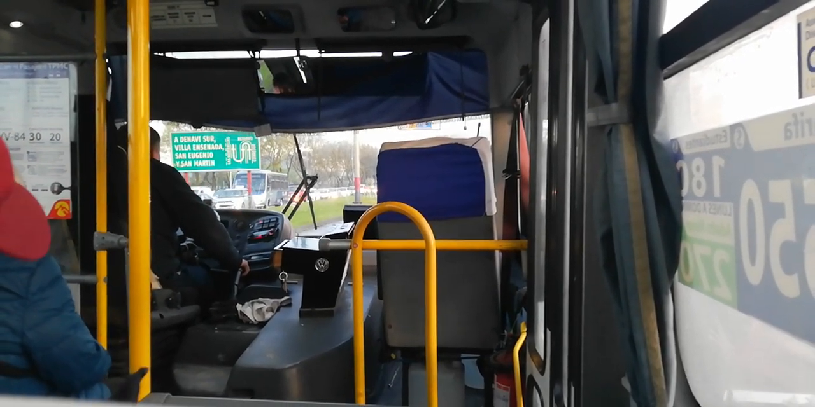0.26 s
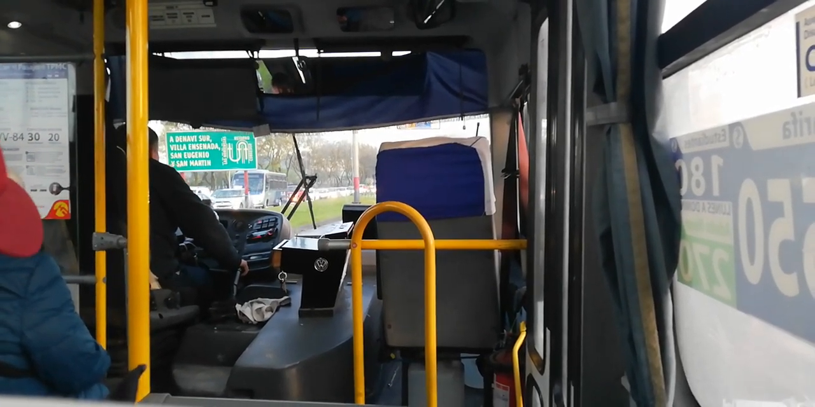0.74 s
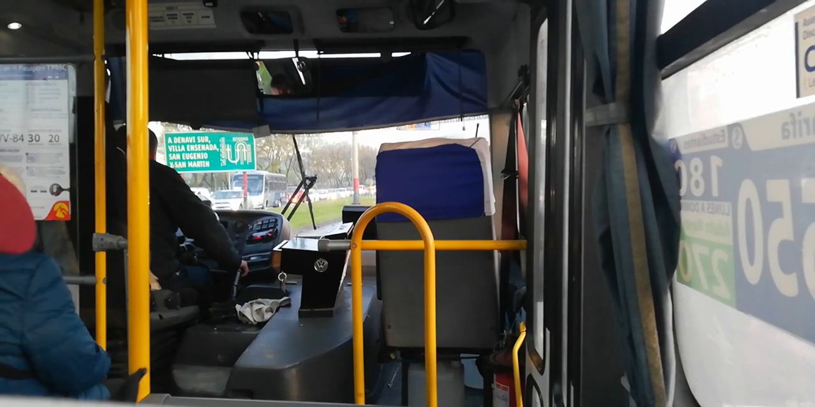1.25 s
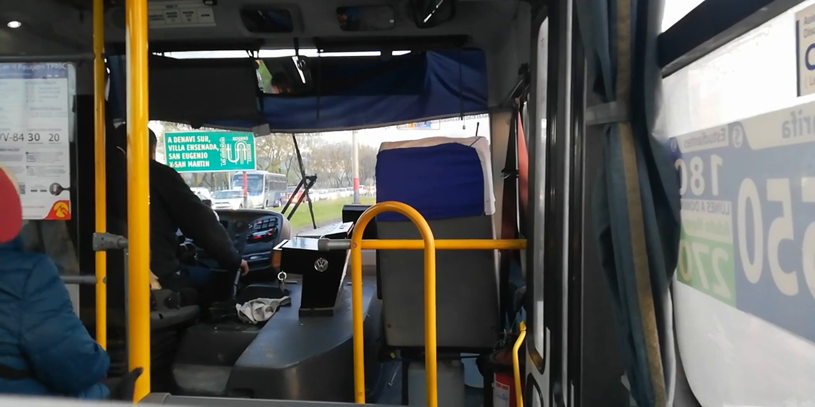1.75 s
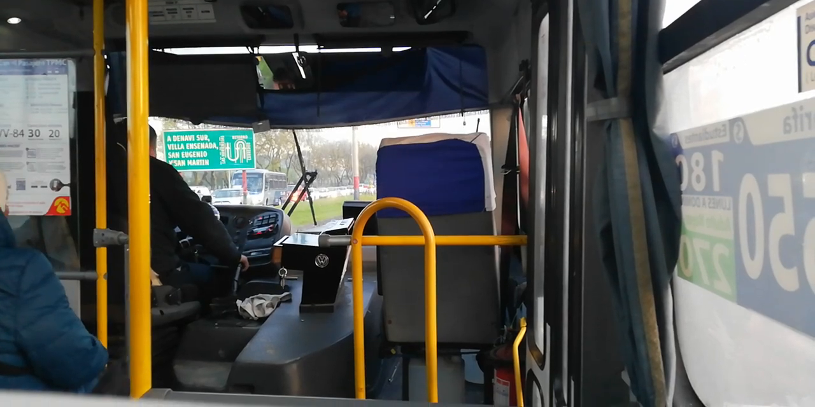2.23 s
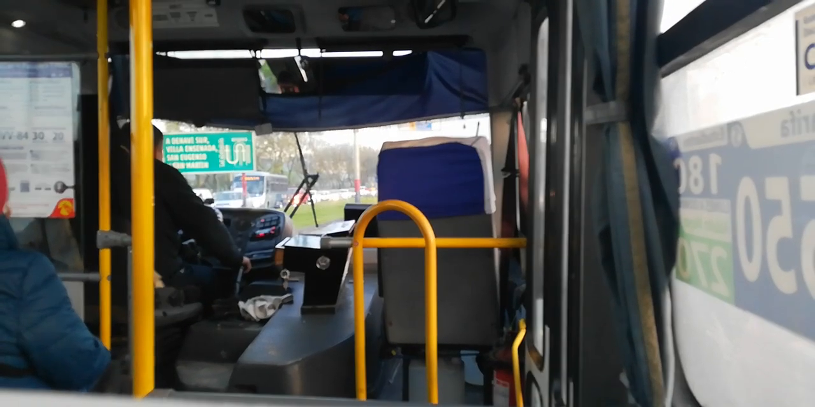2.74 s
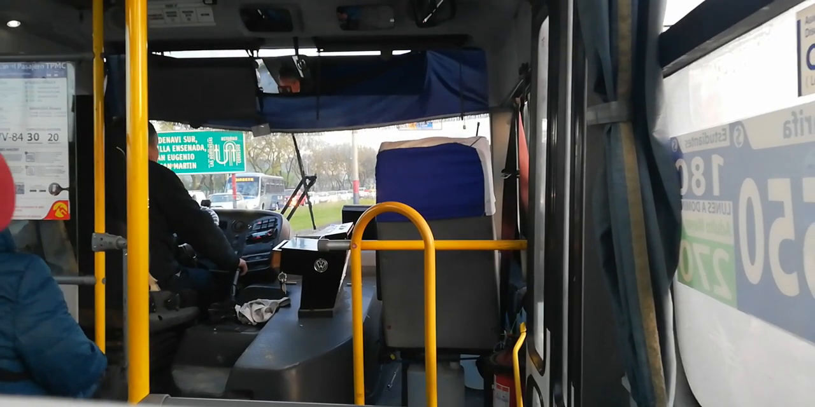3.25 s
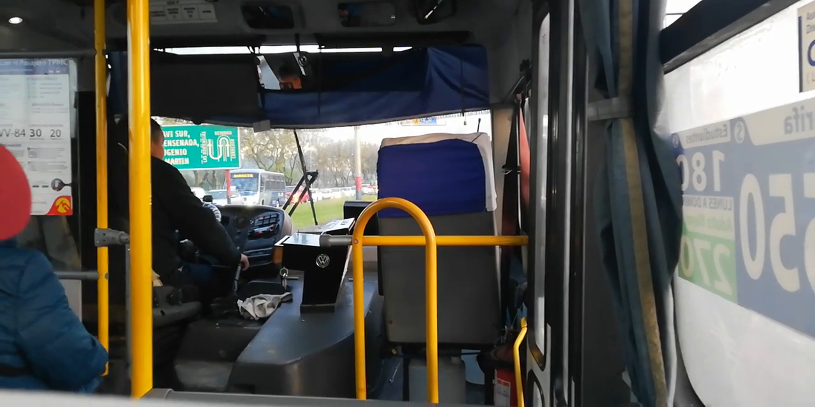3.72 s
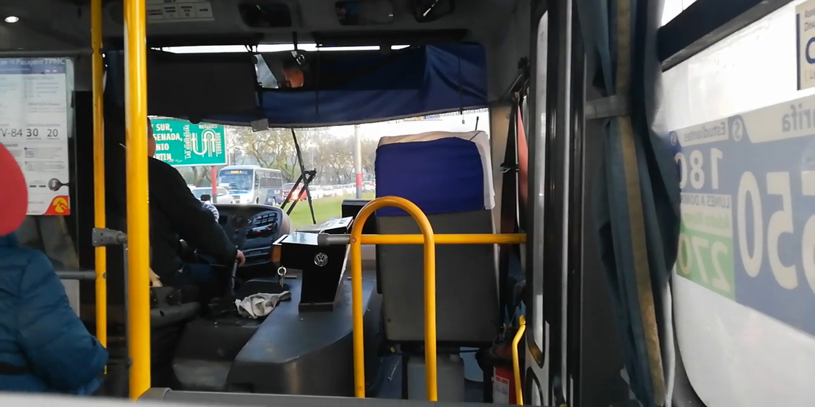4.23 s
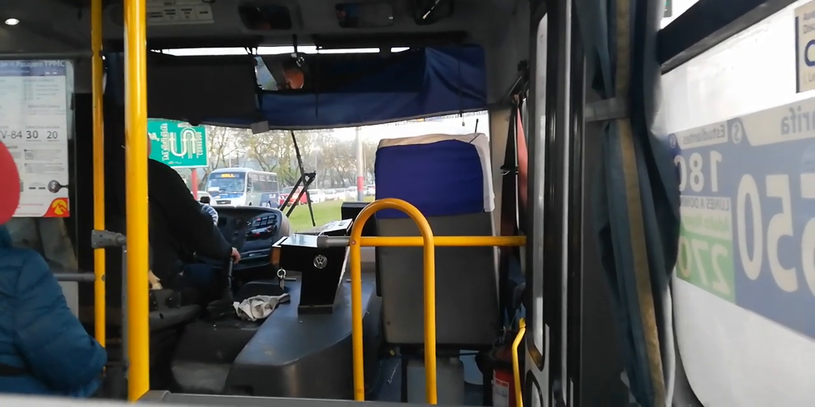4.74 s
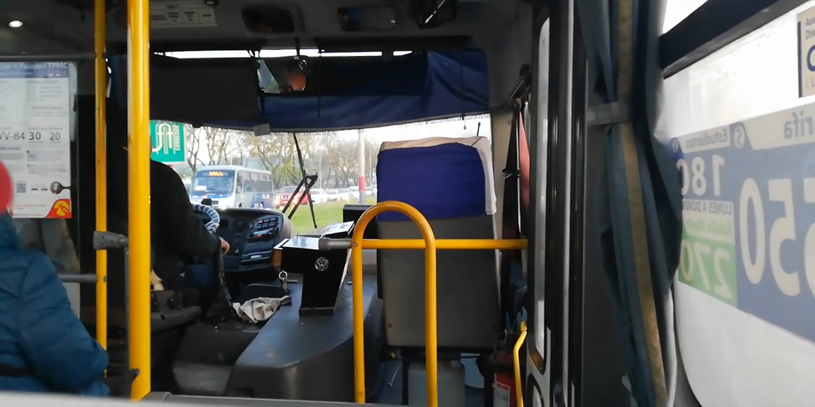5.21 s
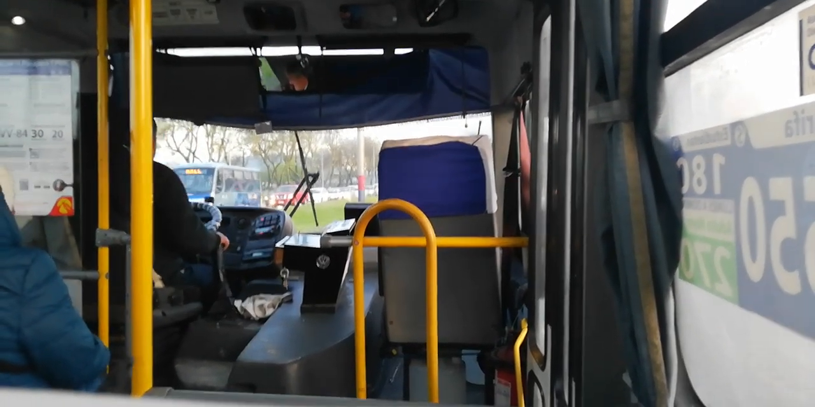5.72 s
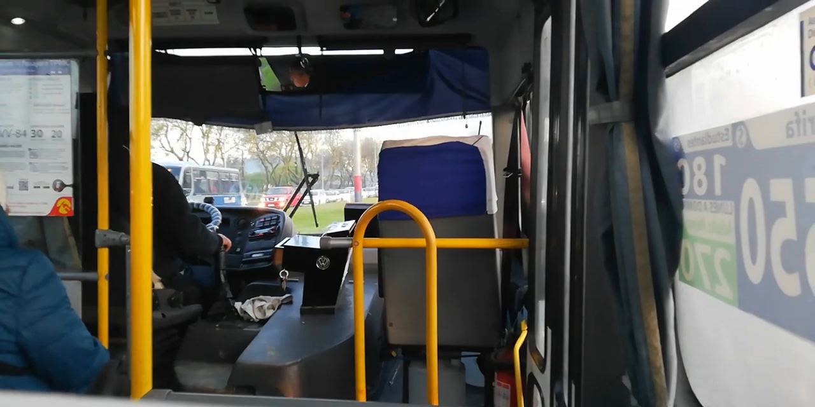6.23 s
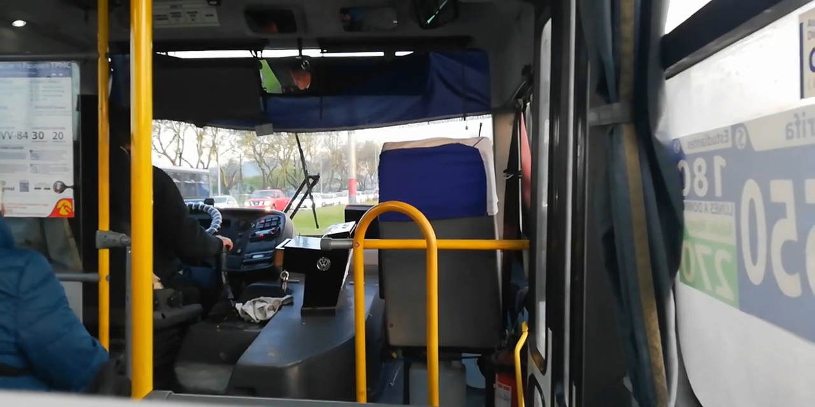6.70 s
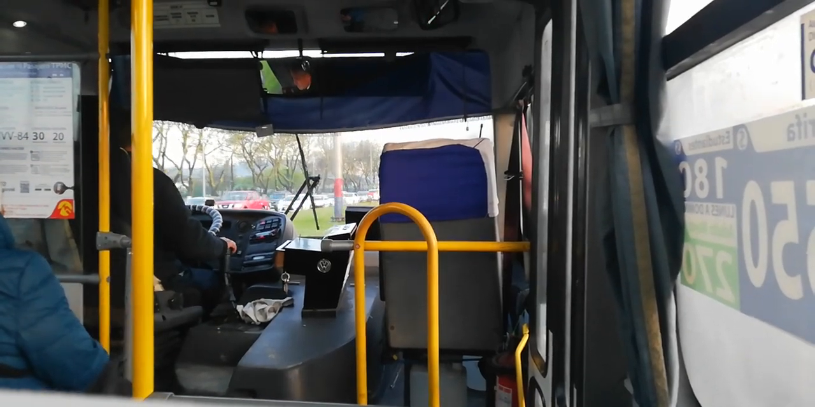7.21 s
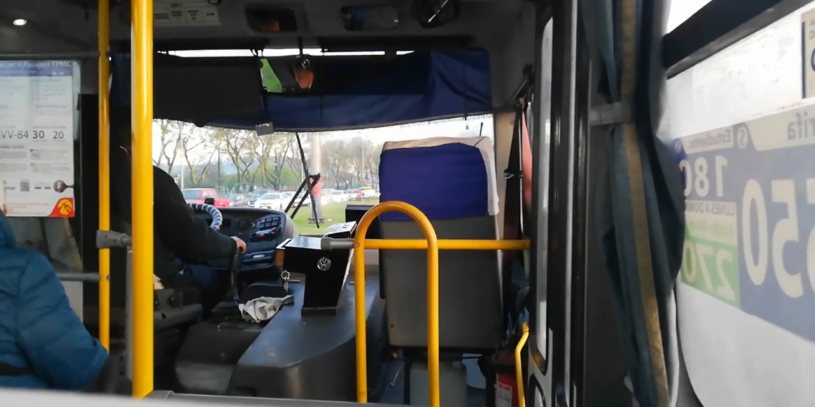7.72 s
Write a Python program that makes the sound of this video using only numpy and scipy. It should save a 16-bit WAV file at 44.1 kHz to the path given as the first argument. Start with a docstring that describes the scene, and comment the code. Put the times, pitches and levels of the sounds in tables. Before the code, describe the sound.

Inside a city bus a diesel engine idles with a low, uneven rumble for two seconds, then pulls away, booming and climbing in pitch. The revs fall at a gear change, where fittings tick and a loose panel knocks to the right, then rise again with a thin turbo whistle. Close, boomy stereo cabin sound, with soft hiss above.

```python
"""A four-cylinder diesel heard inside a city bus: it idles, pulls away, drops its revs at a gear change, pulls again.
Sines at multiples of the firing rate and shaped noise boom in the cabin; each firing knocks the head, rings the
block and bursts noise. The turbo whistles as a flickering band, air hisses in puffs, a loose panel knocks off to
the right, fittings tick and a faint tone hangs behind. Two microphone ports a hand apart."""
import sys
import numpy as np
from scipy import signal
from scipy.fft import rfft, irfft, next_fast_len
from scipy.io import wavfile
from scipy.ndimage import uniform_filter1d, map_coordinates

SR = 44100
rng = np.random.default_rng(int(sys.argv[2]) if len(sys.argv) > 2 else 0)


def waveform_to_disk(signal):
    """Save audio, clipped to [-1, 1], as 16-bit WAV at the path in sys.argv[1]."""
    frames = np.transpose(np.atleast_2d(signal))
    scaled = np.clip(frames, -1, 1) * 32767
    samples = np.round(scaled).astype(np.int16)
    wavfile.write(sys.argv[1], SR, samples)


N = 351014

# engine treble before fixed lifts: t/s, clatter level/dB, head knock level/dB
TREBLE_COURSE = [(0, -48.5, -55.5), (1.95, -47, -57), (2.2, -44.5, -56.5), (2.6, -45.5, -56),
                 (3.3, -44.5, -67), (3.45, -42.5, -52), (3.94, -41, -53.5), (4.57, -41.5, -52.5),
                 (4.81, -44.5, -53.5), (5.05, -42, -46.5), (5.5, -43, -54.5), (6.36, -42.5, -55.5),
                 (7.47, -40.5, -50), (7.96, -42.5, -58)]
# how hard the engine works: t/s, torque level/dB, body rumble level/dB
LOAD_COURSE = [(0, -7.5, -9.5), (1.8, -13, -9.5), (2.13, 2, 1.5), (2.4, 3, 2), (2.7, -1.5, -1.5),
               (3.1, -4, 1), (3.45, -2, -1), (3.62, -3, 2), (3.9, 2.5, 1), (4.1, -6.5, 3), (4.35, 1.5, 3),
               (4.75, -0.5, 2), (4.96, -14, 0), (5.14, -4, 3), (5.58, -11, -2), (5.72, -10, 5.5),
               (6.13, 3.5, 1.5), (6.4, -8, 3.5), (6.9, -1.5, 3), (7.3, -6.5, 4), (7.78, 3, 4.5),
               (7.96, 0, -3.5)]
# cabin resonances, for the weak orders and the rumble: f/Hz, relative level/dB (per Hz for noise)
CABIN_RESPONSE = [(15, -3.5), (45, -14), (76, 0.5), (100, 2.5), (122, 4.5), (137, -9.5), (152, 3.5),
                  (175, -1.5), (205, -22.5), (260, -54)]
CLATTER_MID_DB = -44  # middle clatter, from which ring, hiss and intake grow


def amp(db):
    """Amplitude factor of a level in dB."""
    return 10 ** (np.asarray(db) / 20)


def unit(x):
    """x scaled to rms 1."""
    return x / np.sqrt(np.mean(x ** 2) + 1e-20)


def along(points, hz):
    """Interpolates (Hz, value) points on a log frequency axis."""
    f, value = np.transpose(points)
    return np.interp(np.log(hz + 1), np.log(f + 1), value)


def curves(rows):
    """One value per sample for each column after the time."""
    s, *columns = np.transpose(rows)
    return [np.interp(np.arange(N) / SR, s, column) for column in columns]


def wobble(rate):
    """A smooth random curve with rate knots a second."""
    knots = rng.standard_normal(int(N * rate / SR) + 4)
    return map_coordinates(knots, [np.arange(N) * rate / SR])


def filtered(x, response):
    """x times a complex response of frequency."""
    m = next_fast_len(N + SR // 2)
    return irfft(rfft(x, m) * response(np.fft.rfftfreq(m, 1 / SR)), m)[..., :N]


def noise(spectrum, alike, patchy_db):
    """Stereo noise of rms 1 with patches of random gain; alike is the correlation between the ports."""
    z = signal.stft(rng.standard_normal((2, N)), nperseg=512)[2]
    field = uniform_filter1d(rng.standard_normal(z.shape[1:]), 6, 0)  # smooth over frequency
    field = uniform_filter1d(field, 8, 1)  # smooth over time
    patchy = signal.istft(z * amp(patchy_db * unit(field)), nperseg=512)[1][:, :N]
    top_hz = spectrum[-1][0]
    shaped = filtered(patchy, lambda hz: amp(along(spectrum, hz)) * (hz < top_hz))
    turn = np.arccos(np.clip(alike, -1, 1)) / 2
    mid, side = shaped * [[np.cos(turn)], [np.sin(turn)]]
    return unit(np.array([mid + side, mid - side]))


def struck(hits, modes, scatter_db, attack):
    """Each (s, dB) blow rings decaying sine modes (Hz, dB, t60 s) at new strengths; attack in s."""
    out, t = np.zeros(N + SR), np.arange(SR // 8) / SR
    hz, level, t60 = np.transpose(modes)[:, :, None]
    onset = (1 - np.exp(-t / attack)) ** 2
    rings = amp(level - 60 * t / t60) * np.sin(2 * np.pi * hz * t) * onset
    spreads = rng.standard_normal((len(hits), len(modes)))
    for (s, db), spread in zip(hits, spreads):
        out[round(s * SR):][:len(t)] += amp(db + scatter_db * spread) @ rings
    return out[:N]


def bursts(hits, t60, spectrum):
    """Noise that starts at once at each (s, dB) hit and dies away."""
    blows = np.zeros(N)
    blows[[round(s * SR) for s, db in hits]] = [amp(db) for s, db in hits]
    fade = amp(-60 * np.arange(SR // 5) / SR / t60)
    return signal.fftconvolve(blows, fade)[:N] * noise(spectrum, alike=0.039, patchy_db=1)


def swells(rows):
    """Flat-topped swells from (s, half length s, dB) rows."""
    t = np.arange(N) / SR
    return sum(amp(db) * np.exp(-((t - s) / half) ** 4) for s, half, db in rows)


def steady(x):
    """x held near rms 1 over a running half second, whatever the engine speed."""
    return x / np.sqrt(np.abs(uniform_filter1d(x ** 2, SR // 2)) + 1e-9)


def late_left(pair, seconds):
    """The sound reaches the left port later than the right one."""
    return filtered(pair, lambda hz: np.exp(-1j * np.pi * hz * seconds * np.array([[1], [-1]])))


def engine_side(pair):
    """The engine's sound reaches the left port at a later phase."""
    # left port behind the right: f/Hz, phase lag/rad
    phase_lag = [(200, .2), (344, 1), (470, 2.1), (730, 3), (1100, 6.1), (1900, 5.6), (2050, 4.7),
                 (2300, 5.7), (3200, 5.2)]
    return filtered(pair, lambda hz: np.exp(-.5j * along(phase_lag, hz) * np.array([[1], [-1]])))


def fan():
    """A thin, slightly unsteady sine, perhaps a heater fan."""
    # faint tone: t/s, f/Hz, level/dB
    fan_tone = [(0, 451.3, -59.5), (2, 453, -61.5), (2.5, 447, -54), (2.9, 440.5, -54.5), (3.2, 443, -66)]
    hz, db = curves(fan_tone)
    return amp(db + 1.6 * wobble(4.7)) * np.sin(2 * np.pi * np.cumsum(hz) / SR)


def rough_swell():
    """Brief rough noise swells in the middle range, at idle and on pulling away."""
    # swells: t/s, half length/s, level/dB
    swell_times = [(1.315, 0.17, -52.5), (2.348, 0.16, -51.5)]
    # their noise: f/Hz, level/dB per Hz
    rough_spectrum = [(750, -29), (900, 6), (1040, -8), (1160, 7.5), (1330, -3), (1700, -14)]
    return amp(1.5 * wobble(39.2)) * swells(swell_times) * noise(rough_spectrum, alike=0.76, patchy_db=3)


def chuffs():
    """Short chuffs high up: noise that starts at once and dies away."""
    # chuffs: t/s, level/dB
    chuff_hits = [(3.093, -48), (3.424, -44), (5.84, -43), (5.89, -40), (6.044, -40.5), (6.097, -44),
                  (6.15, -43), (6.252, -41.5), (6.298, -47), (6.325, -45)]
    # their noise: f/Hz, level/dB per Hz
    chuff_spectrum = [(4000, -34), (5000, 2), (6100, -3.5), (7200, -7), (8700, 4), (9600, -4), (11500, -48)]
    return bursts(chuff_hits, 0.17, chuff_spectrum)


def fitting_ticks():
    """Fittings tick: short high modes ring together with a spit of noise."""
    # ticks: t/s, relative level/dB
    tick_hits = [(2.6694, -39), (4.944, -41), (4.9675, -35), (4.9857, -35), (5.026, -30), (5.8376, -30.5),
                 (5.874, -32), (5.888, -31), (5.94, -19), (5.9713, -31)]
    # modes of a fitting: f/Hz, relative level/dB, t60/s
    fitting_modes = [(6570, 3, 0.011), (7730, 5, 0.011), (9300, 1, 0.0098)]
    # noise of a tick: f/Hz, level/dB per Hz
    spit_spectrum = [(1500, -20), (2600, 0), (4200, -6), (7500, 0), (11500, -2), (13200, -20), (15500, -38)]
    ring = struck(tick_hits, fitting_modes, scatter_db=-2.0, attack=0.00034)
    return amp(-9) * ring + amp(-2.5) * bursts(tick_hits, 0.012, spit_spectrum)


def panel_knocks():
    """A loose panel off to the right: detuned modes swell in softly over a burst of noise that starts at once."""
    # knocks: t/s, relative level/dB
    knock_hits = [(4.245, -32), (4.595, -30), (4.947, -28), (5.007, -28.5), (5.175, -32), (5.639, -33),
                  (5.705, -33), (5.764, -28), (5.889, -18.5), (5.954, -21), (6.323, -30), (6.505, -28),
                  (6.787, -33), (7.224, -26.5), (7.566, -29)]
    # modes of the panel: f/Hz, relative level/dB, t60/s
    panel_modes = [(580, 0, .027), (680, -8, .024), (1050, -6, .025)]
    # noise under each knock: f/Hz, level/dB per Hz
    knock_spectrum = [(380, -5), (600, -8), (1050, -17), (1400, -22)]
    thud = np.zeros(N)
    for hit in knock_hits:
        detune = 1 + .022 * rng.standard_normal(len(panel_modes))  # never held the same way twice
        modes = [(hz * d, db, t60) for (hz, db, t60), d in zip(panel_modes, detune)]
        thud += struck([hit], modes, scatter_db=1.2, attack=.016)  # a padded contact swells in slowly
    placed = late_left(thud * amp([[30], [31]]), seconds=0.00062)
    return placed + amp(-20) * bursts(knock_hits, 0.37, knock_spectrum)


def air_puffs():
    """Short puffs of air: flat-topped swells of flickering noise."""
    # puffs: t/s, half length/s, level/dB
    puff_times = [(1.26, 0.11, -54), (1.736, 0.032, -51.5), (2.297, 0.054, -48.5), (2.673, 0.0093, -44.5),
                  (2.709, 0.032, -49.5), (2.873, 0.045, -45), (2.948, 0.018, -46), (3.824, 0.043, -49),
                  (5, 0.062, -49.5), (5.51, 0.023, -50), (5.864, 0.026, -47), (6.603, 0.018, -49)]
    # their noise: f/Hz, level/dB per Hz
    puff_spectrum = [(3000, 7), (5000, 11), (8000, 8), (11000, 8.5), (14000, -8), (15800, -18)]
    return swells(puff_times) * amp(1.8 * wobble(60)) * noise(puff_spectrum, alike=.05, patchy_db=1.5)


def air_hiss(gate):
    """Intake and street hiss grow with the clatter; the wide hiss also pulses with the firings."""
    # wide hiss: f/Hz, level/dB per Hz
    hiss_spectrum = [(2060, 3.5), (3500, 8), (4070, 5), (4910, 10.5), (6340, 6), (9340, 4.5), (12200, -4),
                     (14500, -13), (15600, -14)]
    # breathy band of the intake: f/Hz, level/dB per Hz
    intake_spectrum = [(7800, -16), (8500, -5), (9200, -7), (9900, -8)]
    above_mid = curves(TREBLE_COURSE)[0] - CLATTER_MID_DB
    # levels in dB at middle clatter, growth in dB per clatter dB
    hiss_db = -50 + 1.29 * above_mid + 0.34 * wobble(14)
    intake_db = -61.5 + 3.5 * above_mid
    hiss = unit(gate ** .5 * noise(hiss_spectrum, alike=0.0073, patchy_db=1.8))
    return amp(hiss_db) * hiss + amp(intake_db) * noise(intake_spectrum, alike=0.046, patchy_db=1.0)


def turbo():
    """The turbo's breathy whistle: a gliding sine, randomly modulated at each port."""
    # whistle: t/s, f/Hz, level/dB
    whistle = [(3.6, 8000, -80), (4.2, 8700, -64), (4.62, 9500, -53), (4.76, 8700, -60), (4.8, 8600, -90),
               (6.65, 8400, -92), (6.8, 8750, -52), (6.95, 9100, -49), (7.15, 9560, -52), (7.4, 10200, -55),
               (7.7, 10950, -61), (7.96, 11450, -70)]
    hz, db = curves(whistle)
    # widens the line to a flickering band
    blur = np.array([wobble(220), wobble(220)]) * amp(1.5 * wobble(20))
    return amp(db) * blur * np.sin(2 * np.pi * np.cumsum(hz) / SR)


def road_shudder():
    """Deep shudder through the wheels: slowly wavering low noise, nearly alike at both ports."""
    # shudder: f/Hz, level/dB per Hz
    road_spectrum = [(20, -8), (40, 5), (62, -14)]
    road_db = -33 + 2.6 * wobble(4.14)  # at body rumble 0
    return amp(road_db) * noise(road_spectrum, alike=.998, patchy_db=-0.5)


def floor_roar(firings, load_db):
    """The floor roars with the cabin rumble, throbbing once a firing."""
    # roar: f/Hz, level/dB per Hz
    floor_spectrum = [(170, -6), (210, 5.5), (228, -6.5), (247, 2), (275, -5), (330, -8), (450, -18),
                      (600, -13), (850, -27)]
    throb = 1 + .3 * np.cos(2 * np.pi * firings)
    roar = engine_side(throb * noise(floor_spectrum, alike=.9, patchy_db=1.5))
    return amp(-37.5 + 0.96 * load_db) * roar  # dB at load 0, then per load dB


def firing_blows(firings):
    """Time (s) and strength (dB) of each firing, and a noise gate that jumps up and decays with it."""
    # knock of each cylinder in firing order: relative level/dB
    cylinder_db = [0, -12, -4, -12]
    count = np.arange(int(firings[-1]))
    times = np.interp(count, firings, np.arange(N) / SR)
    strength = np.resize(cylinder_db, len(count)) + rng.standard_normal(len(count))
    now = firings.astype(int)
    gate = 1 + 0.42 * amp(np.append(strength, 0)[now]) * np.exp(-3 * (firings - now))
    return times, strength, gate


def clatter(times, strength, gate):
    """Each firing knocks the head, rings the block and its cover and bursts noise; the cylinders differ."""
    # cylinder head modes: f/Hz, relative level/dB, t60/s
    head_modes = [(915, -5, .07), (1330, -5, .04), (1650, -8, .03), (2060, 0, .085), (2240, -11, .1),
                  (3180, -12, .04), (9200, -22, .03)]
    # engine block modes: f/Hz, relative level/dB, t60/s
    block_modes = [(1216, -13, 0.11), (1329, -8.5, 0.19), (1423.4, 0, 0.14), (2705, -5.5, 0.097),
                   (3150, 5.5, 0.047)]
    # one thin cover on the block: f/Hz, relative level/dB, t60/s
    cover_modes = [(2240, 0, .12)]
    # level of the cover: t/s, level/dB
    cover_course = [(0, -76), (3.2, -78), (3.7, -55), (5.2, -82), (5.7, -76), (6.4, -79), (6.75, -53.5),
                    (7.85, -62), (7.96, -74)]
    # burst noise: f/Hz, level/dB per Hz
    burst_spectrum = [(380, -5), (450, -4), (590, -12.5), (740, -7), (900, -7.5), (1250, -6.5), (1750, -8),
                      (2100, -7), (2600, -14), (3300, -15), (4000, -25), (5000, -32)]
    clatter_db, knock_db = curves(TREBLE_COURSE)
    torque_db = curves(LOAD_COURSE)[0]
    # dB at middle clatter and torque 0, then per clatter dB and per torque dB
    ring_db = -55 + 1.67 * (clatter_db - CLATTER_MID_DB) + 0.21 * torque_db
    cover_db = curves(cover_course)[0] + 1.6 * wobble(7)

    knock = struck(np.transpose([times, strength]), head_modes, scatter_db=1.5, attack=.004)
    uneven_db = 0.5 * strength + 1.5 * rng.standard_normal(len(times))
    chatter = np.transpose([times, uneven_db])
    shared, left, right = (struck(chatter, block_modes, scatter_db=4, attack=0.005) for _ in range(3))
    ring = 0.56 * shared + np.array([left, right])
    cover = struck(chatter, cover_modes, scatter_db=4, attack=.005)
    burst = unit(gate * noise(burst_spectrum, alike=0.25, patchy_db=1.5))

    block = amp(clatter_db + 1.3) * burst + amp(knock_db + 3.0) * steady(knock)
    block = block + amp(ring_db) * steady(ring) + amp(cover_db) * steady(cover)
    return engine_side(block)


def weak_orders(firings, rate):
    """Weaker hums of the engine, each swelling while it passes a cabin resonance."""
    # weaker hums: multiple of firing rate, relative level/dB
    order_levels = [(1.75, -8), (2.25, -16.5), (2.75, -9.5), (3.25, -16.5), (3.5, -3.5), (4.5, -3.5),
                    (5.001, -10.5), (5.999, -13.5)]
    drone = np.zeros(N)
    for k, db in order_levels:
        level_db = db + along(CABIN_RESPONSE, k * rate) + 3 * wobble(3)
        drone += amp(level_db) * np.sin(2 * np.pi * k * firings + .6 * wobble(6))
    return drone


def strong_orders(firings, rate):
    """Strong overtones of the firing rate, each swelling while it passes a cabin resonance."""
    # overtones: multiple of firing rate
    hum_orders = [2, 2.5, 3, 4]
    # relative level of each overtone/dB
    hum_levels = [3.5, -3, -3, -6.5]
    # growth of each overtone/dB per Hz of firing rate above 55 Hz
    hum_growth = [-0.052, 0.15, -0.14, 0.13]
    # the cabin's answer to them: f/Hz, level/dB
    boom_response = [(66, -45.5), (77, -22), (86, -30.5), (97, -39.5), (121, -31.5), (135, -24), (151, -17),
                     (175, -23.5), (194, -48), (211, -26), (228, -47), (250, -32), (280, -53)]
    hum = np.zeros(N)
    for k, db, grows in zip(hum_orders, hum_levels, hum_growth):
        level_db = db + grows * (rate - 55) + along(boom_response, k * rate) + .8 * wobble(6)
        hum += amp(level_db) * np.sin(2 * np.pi * k * firings)
    return hum


def firing_tone(firings):
    """One sine cycle a firing, shaking the body."""
    # firing tone: t/s, peak level/dB
    firing_course = [(0, -38), (0.6, -33), (0.8, -37), (1.9, -36), (2.15, -30), (2.3, -21), (2.47, -17),
                     (2.9, -21), (3.15, -29), (3.3, -27), (3.46, -15.5), (3.58, -27), (3.8, -32),
                     (4.05, -27), (4.38, -12), (4.6, -14.5), (4.78, -12.5), (5.02, -22), (5.4, -38),
                     (5.7, -30), (5.9, -25), (6.15, -15.5), (6.35, -23), (6.55, -22), (7.2, -27),
                     (7.47, -26), (7.75, -16), (7.96, -17.5)]
    return amp(curves(firing_course)[0]) * np.sin(2 * np.pi * firings)


def boom(firings, rate):
    """Engine hums swell with torque; weak orders, cabin rumble, shudder and roar follow the body load."""
    torque_db, load_db = curves(LOAD_COURSE)
    rumble = noise(CABIN_RESPONSE, alike=0.98, patchy_db=0.5)
    body = amp(-28.5) * weak_orders(firings, rate) + amp(-27) * rumble + road_shudder()  # at load 0
    hum = amp(torque_db) * strong_orders(firings, rate)
    return firing_tone(firings) + hum + amp(load_db) * body + floor_roar(firings, load_db)


def scene():
    """Sums the cabin's small sounds, the air and the engine, all engine parts on one firing count."""
    # engine speed: t/s, firing rate/Hz
    speed_course = [(0, 25.2), (1.8, 25.1), (2.1, 29), (2.4, 33.8), (2.55, 34.7), (2.72, 33.2), (3.02, 32),
                    (3.18, 32.6), (3.45, 40), (3.74, 49.5), (4.06, 52.5), (4.22, 58.6), (4.52, 67),
                    (4.64, 66.3), (4.82, 61), (5.25, 53), (5.7, 44.2), (6.13, 39), (6.42, 44), (6.9, 48.8),
                    (7.3, 54.5), (7.66, 59.8), (7.96, 60.9)]
    rate = curves(speed_course)[0]
    firings = np.cumsum(rate) / SR
    times, strength, gate = firing_blows(firings)
    small = fan() + rough_swell() + chuffs() + fitting_ticks() + panel_knocks()
    air = air_puffs() + air_hiss(gate) + turbo()
    return small + air + clatter(times, strength, gate) + boom(firings, rate)


def record(dry):
    """The right port hears more treble; nothing passes above the band limit."""
    # difference of the ports: f/Hz, left minus right level/dB
    port_balance = [(110, 0), (200, -1.5), (600, -5), (1300, -2.5), (2400, -4.5), (4400, -1.5), (8000, -2),
                    (15000, -9.5)]
    top_hz = 15746
    sides = np.array([[1], [-1]])
    return filtered(dry, lambda hz: amp(along(port_balance, hz) / 2 * sides) * (hz < top_hz))


dry = scene()
out = record(dry)
waveform_to_disk(out)
```